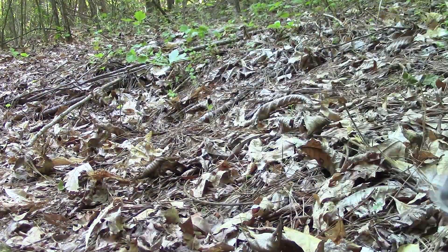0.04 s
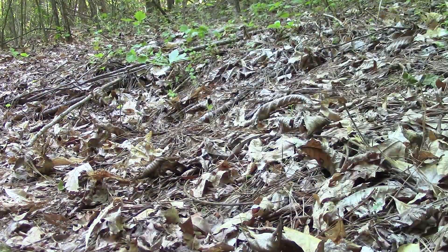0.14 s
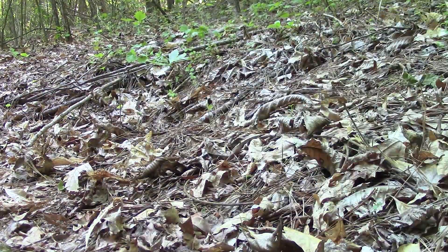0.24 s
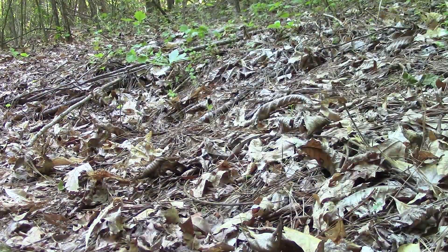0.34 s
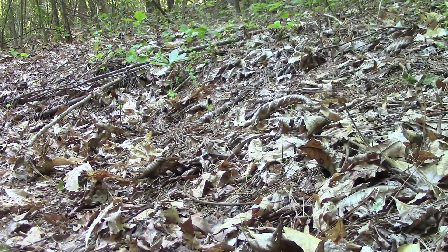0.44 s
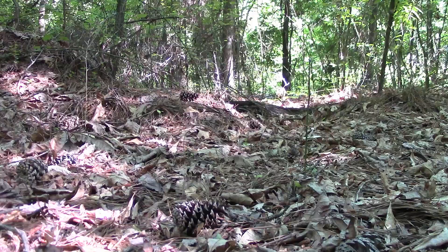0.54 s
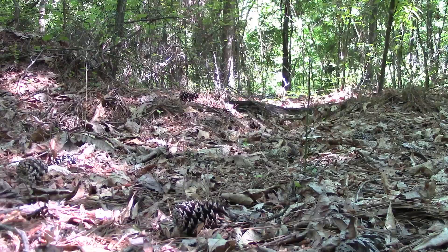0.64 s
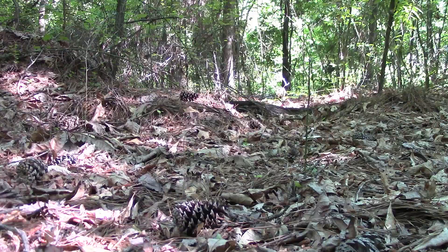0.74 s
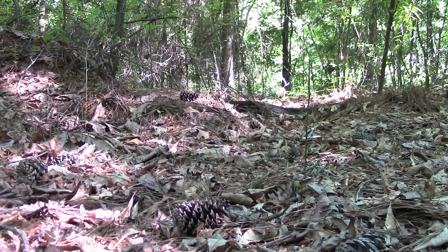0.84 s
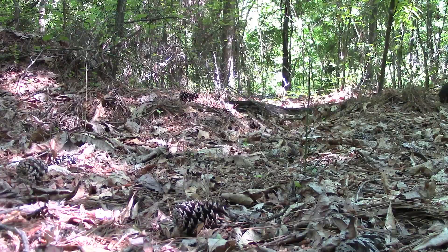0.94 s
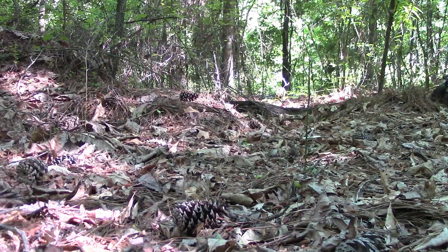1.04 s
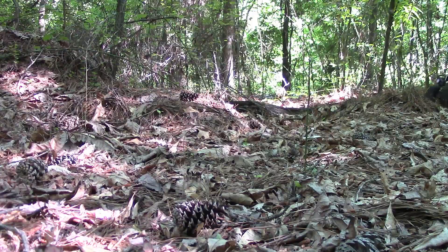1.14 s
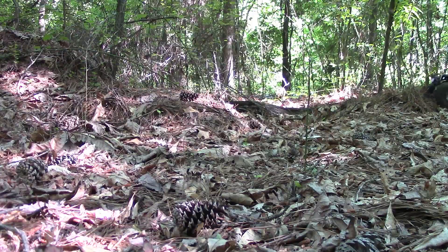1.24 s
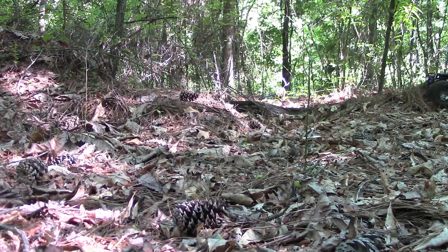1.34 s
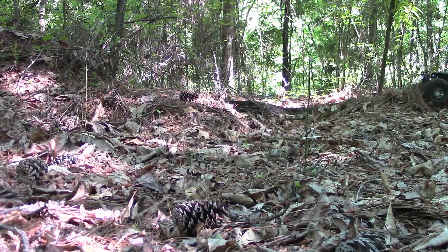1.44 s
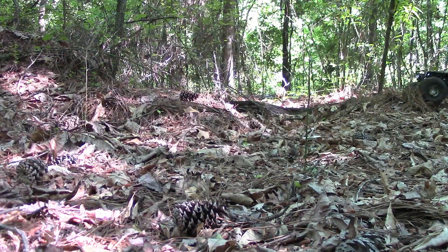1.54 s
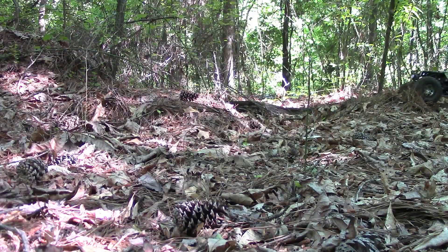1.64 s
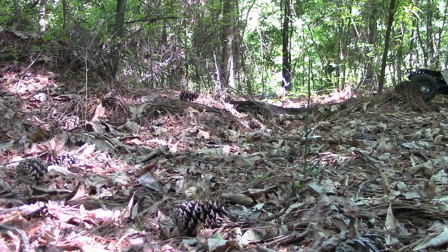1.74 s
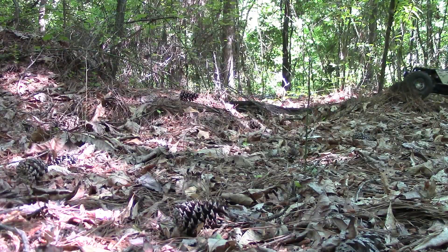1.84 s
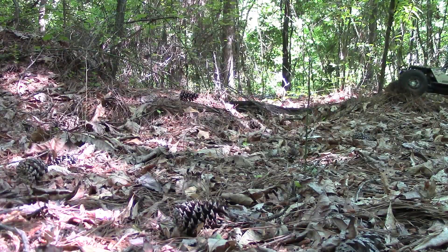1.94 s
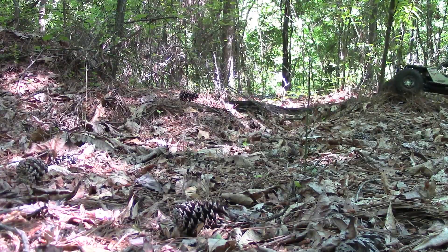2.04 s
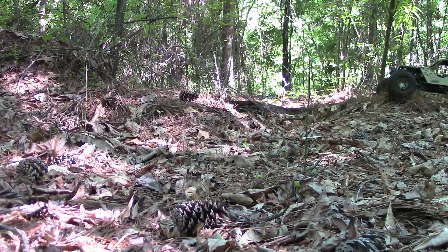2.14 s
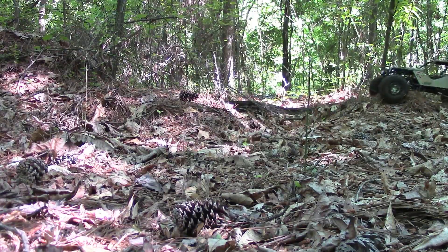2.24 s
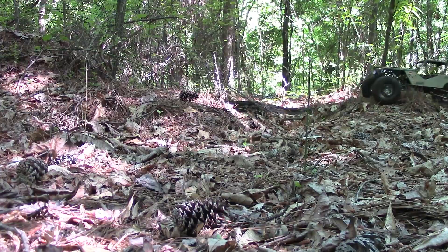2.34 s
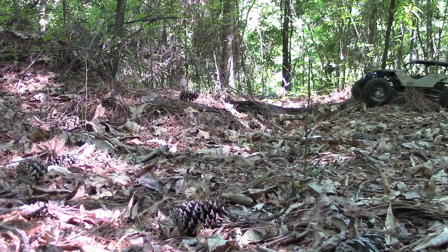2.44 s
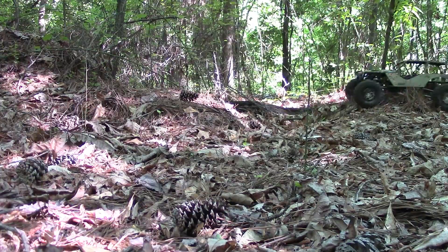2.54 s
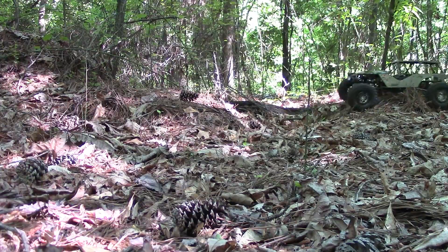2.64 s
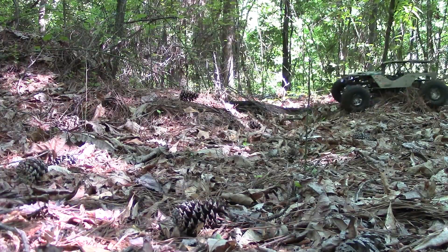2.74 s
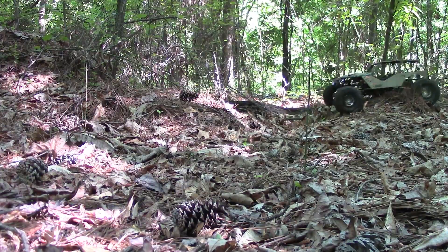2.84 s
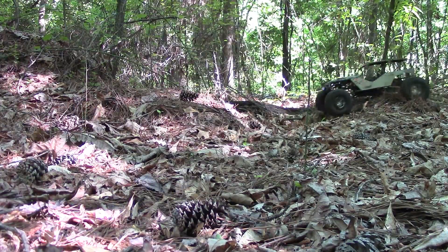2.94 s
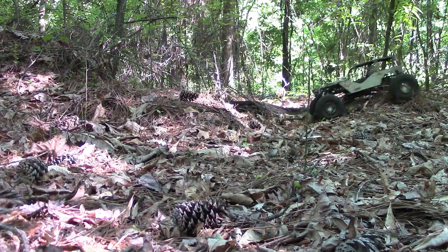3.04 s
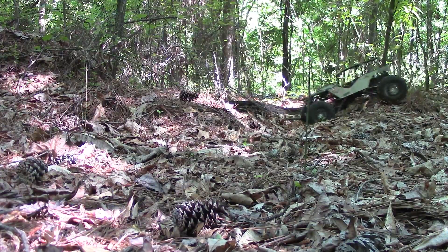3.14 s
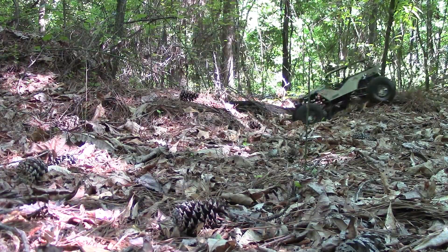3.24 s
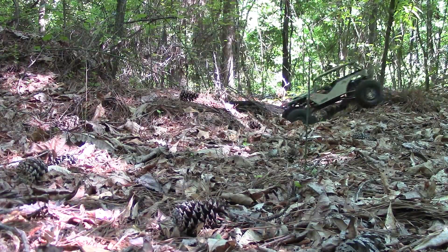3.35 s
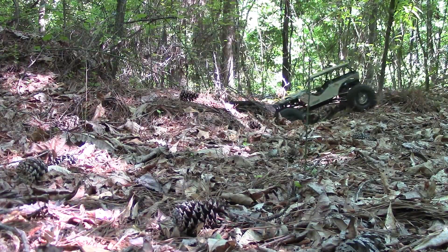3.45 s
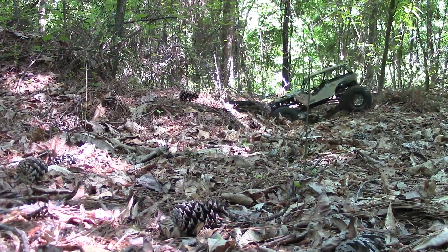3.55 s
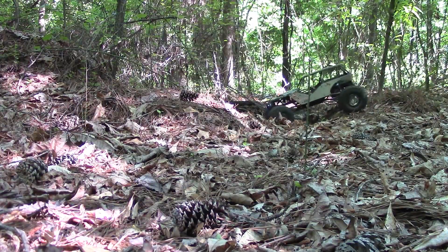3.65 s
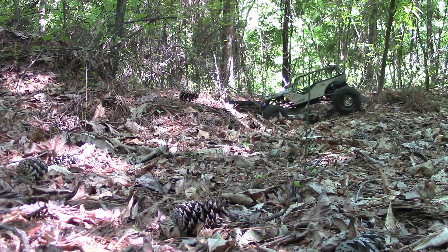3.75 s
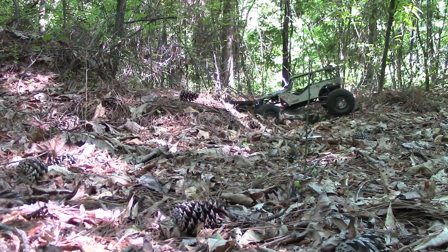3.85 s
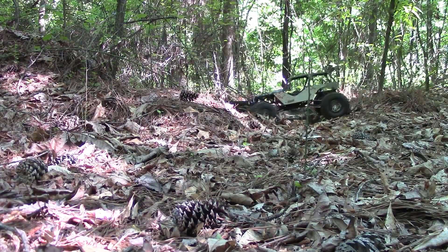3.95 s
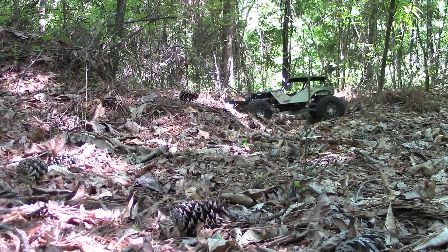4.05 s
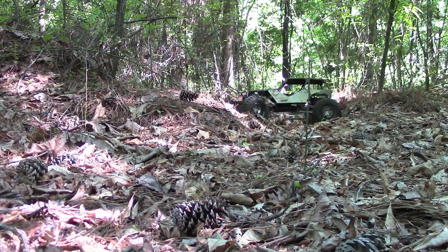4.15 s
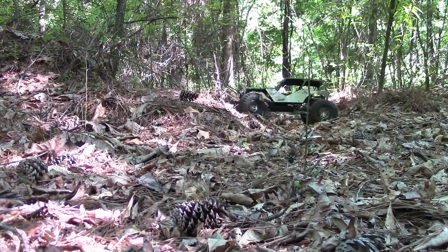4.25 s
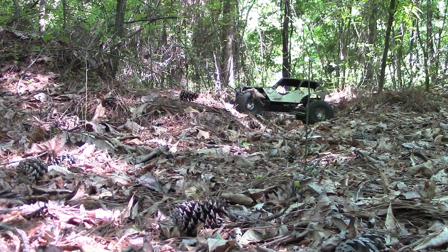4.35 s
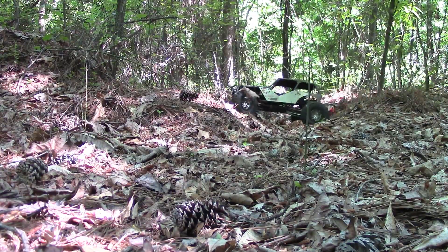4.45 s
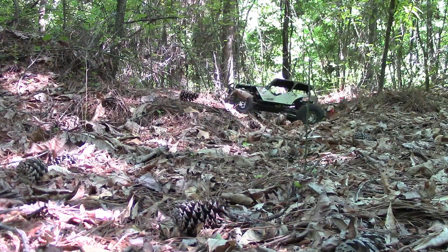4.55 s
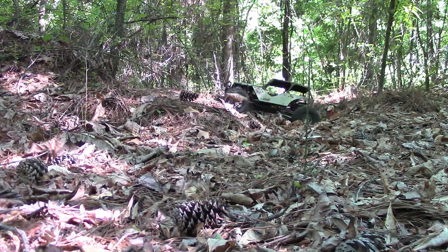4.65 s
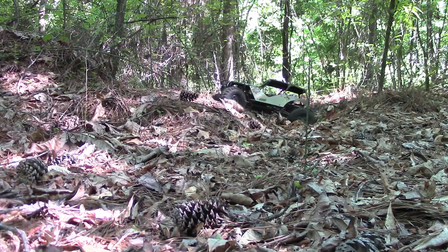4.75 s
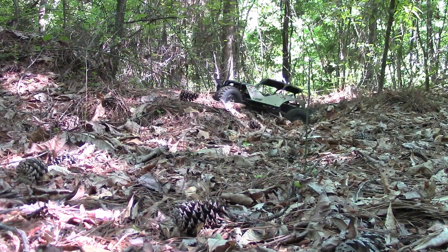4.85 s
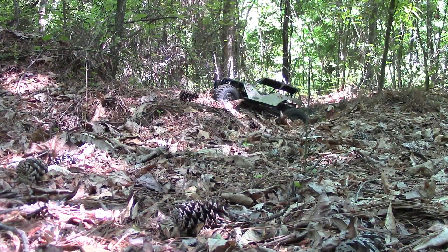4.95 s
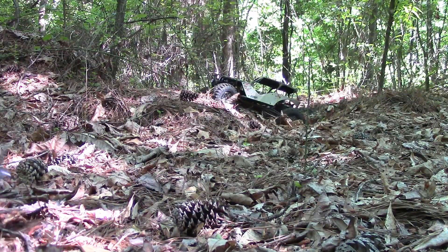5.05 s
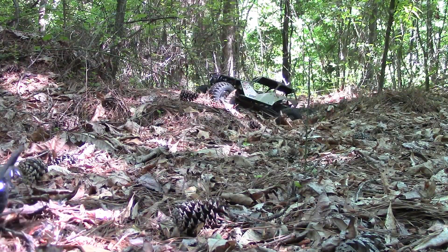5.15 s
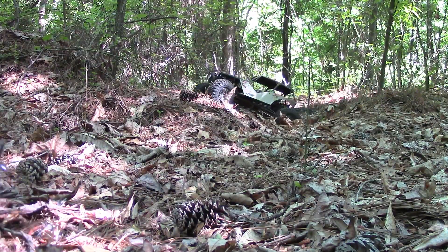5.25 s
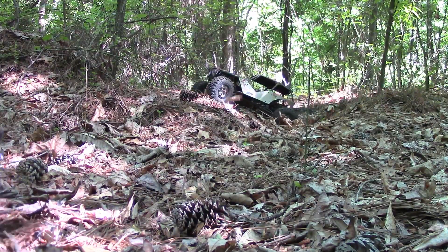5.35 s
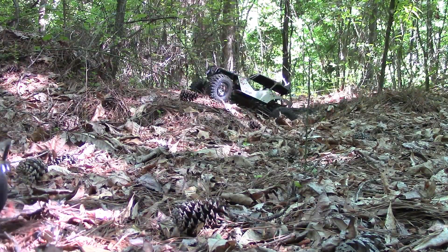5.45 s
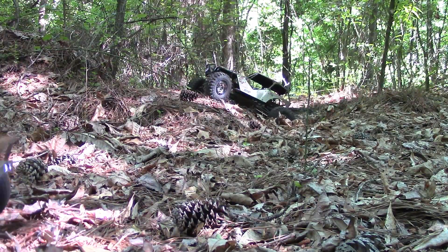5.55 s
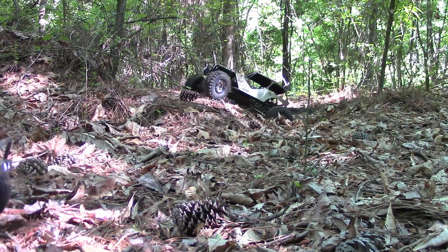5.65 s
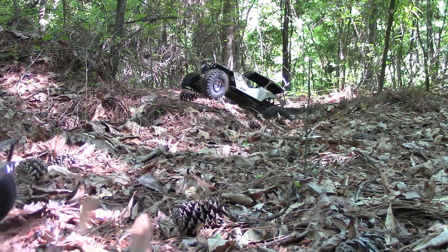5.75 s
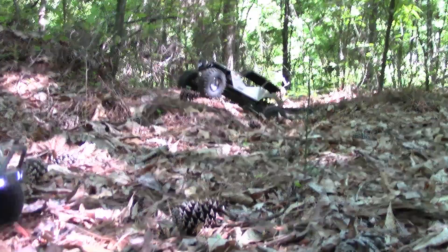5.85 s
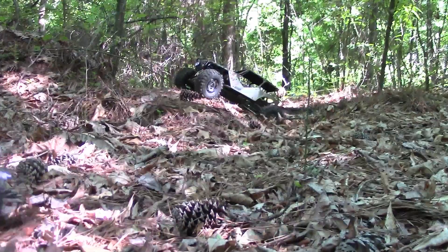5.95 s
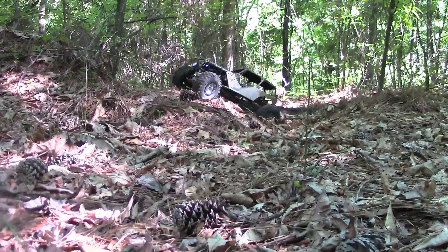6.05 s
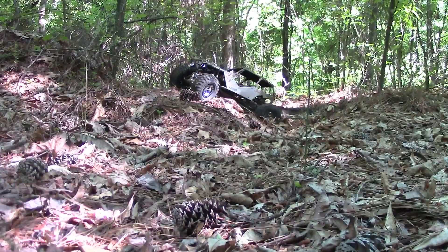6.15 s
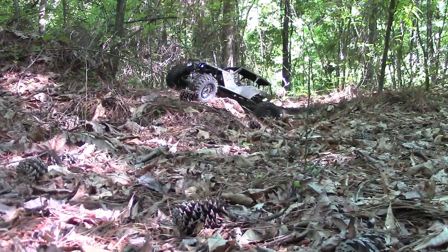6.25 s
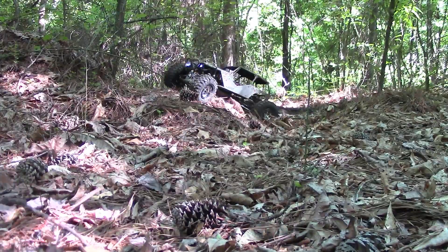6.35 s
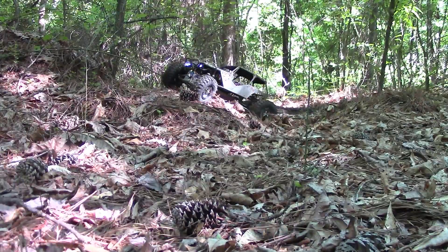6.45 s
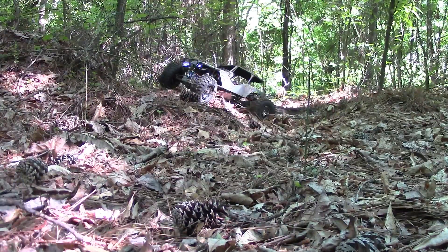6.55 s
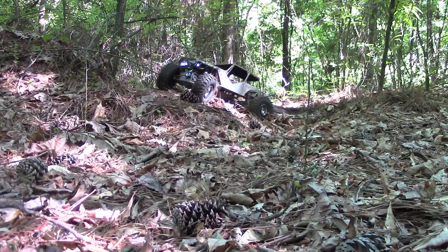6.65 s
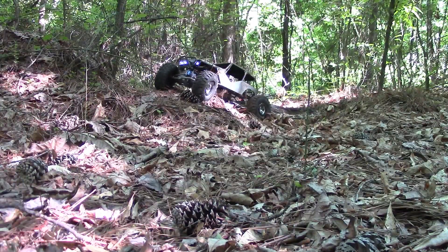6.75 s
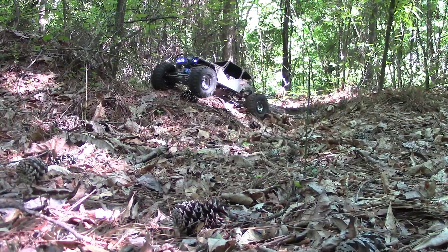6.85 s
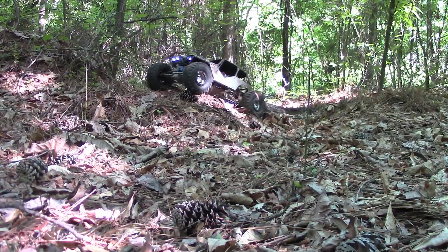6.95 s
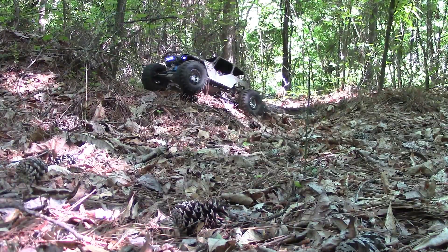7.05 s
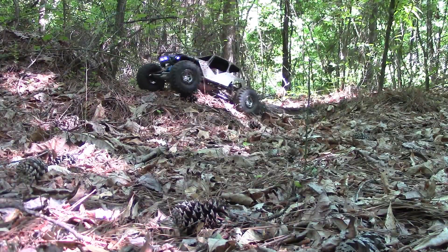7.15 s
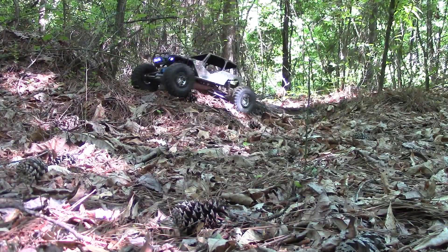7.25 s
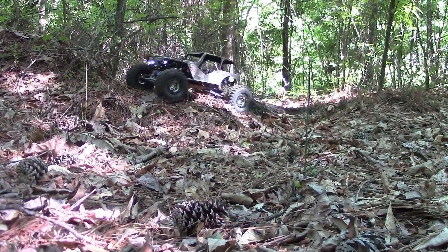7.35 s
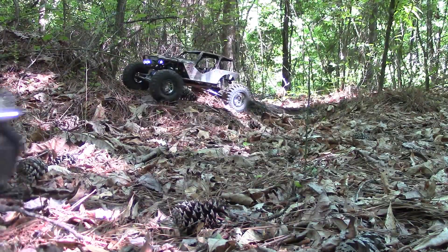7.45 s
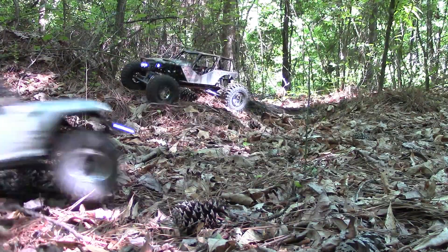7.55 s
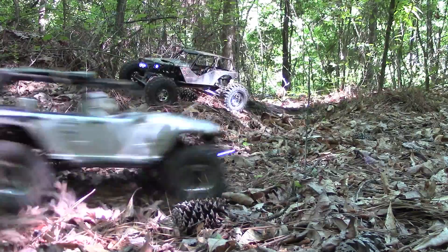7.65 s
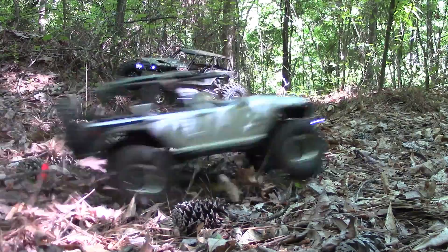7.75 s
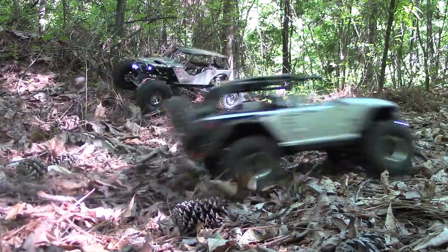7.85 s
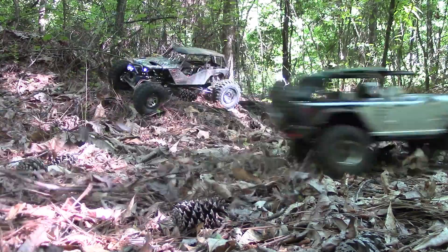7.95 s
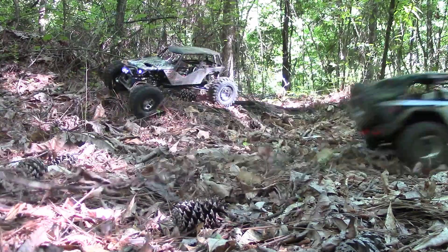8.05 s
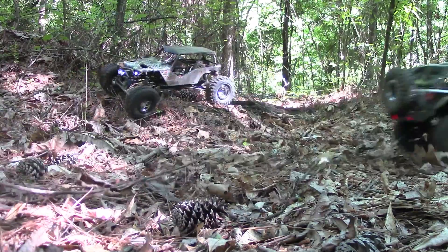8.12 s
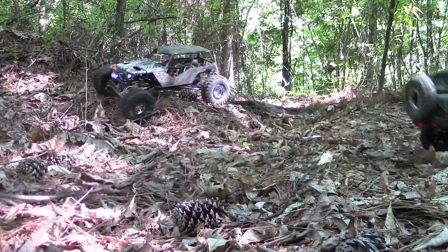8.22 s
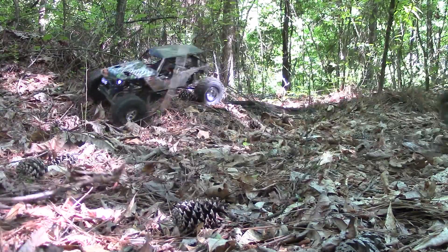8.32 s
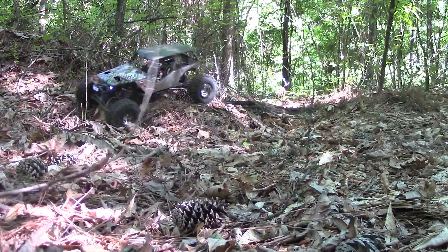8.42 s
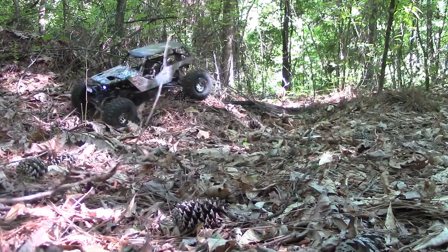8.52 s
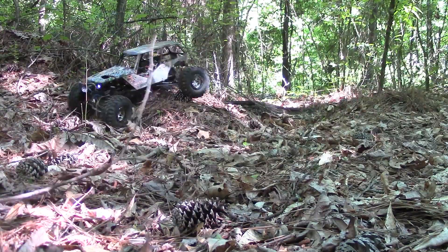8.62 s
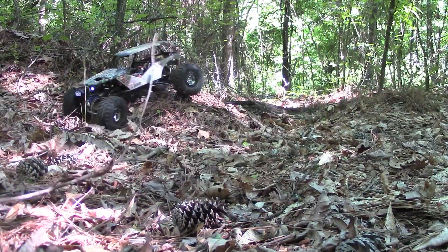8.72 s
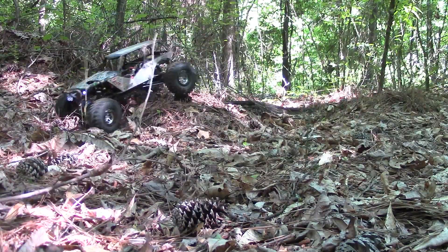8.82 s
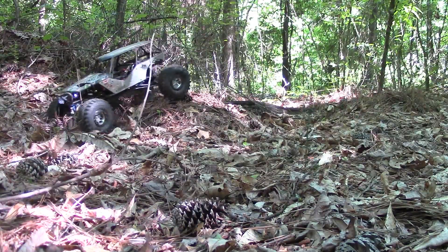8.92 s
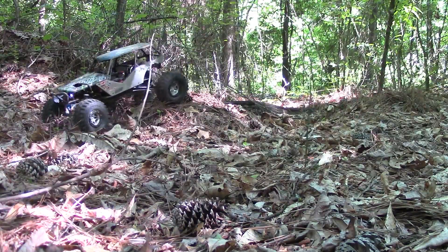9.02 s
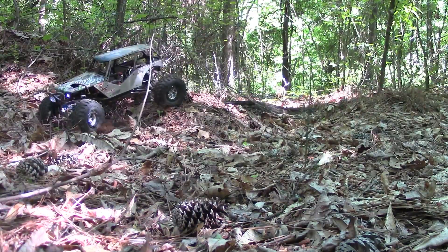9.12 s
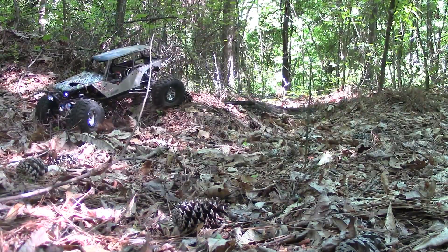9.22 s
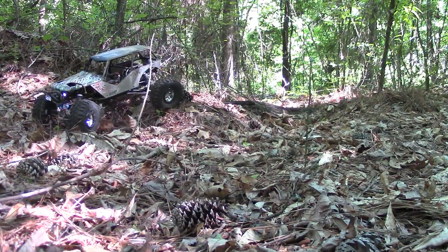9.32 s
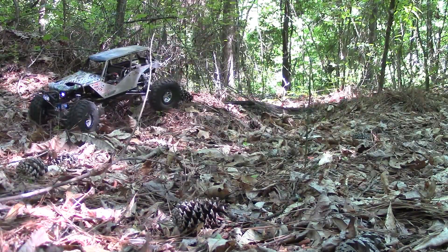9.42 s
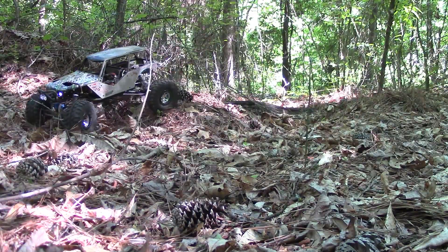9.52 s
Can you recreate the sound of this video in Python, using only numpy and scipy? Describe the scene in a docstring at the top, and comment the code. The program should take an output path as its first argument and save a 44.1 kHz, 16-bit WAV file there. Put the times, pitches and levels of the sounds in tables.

```python
"""Wheels rush through dry leaves right beside the microphone; at 0.6 s the rush breaks off sharply. Small
radio-controlled electric trucks drive on a wooded slope: a crawler climbs in bursts, gears whining and servo
buzzing; a second truck darts past about half a metre away, and a motor winds down. Tyres crush leaves, snap
twigs and shake the chassis; meshing teeth sing and rattle their plastic housings. Behind them the wood hisses
faintly, a far motor drones briefly and a speed controller whistles."""
import sys
import numpy as np
from scipy import signal
from scipy.fft import rfft, irfft, next_fast_len
from scipy.io import wavfile
from scipy.ndimage import map_coordinates

SR = 44100
rng = np.random.default_rng(int(sys.argv[2]) if len(sys.argv) > 2 else 0)


def store_pcm(level_fs):
    """Save levels as 16-bit WAV."""
    pcm = np.round(np.clip(level_fs, -1, 1) * 32767).astype(np.int16)
    wavfile.write(sys.argv[1], SR, np.atleast_2d(pcm).T)


N = 422478
TIME = np.arange(N) / SR
TICKS = np.arange(0, N + 64, 64) / SR  # coarse clock for slow curves, in seconds
TOP_HZ = 15950


def amp(db):
    """Decibels to gain."""
    return 10 ** (np.asarray(db) / 20)


def unit(x):
    """Scale to rms 1."""
    return x / np.sqrt(np.mean(x ** 2) + 1e-20)


def per_sample(ticked):
    """Spread one value a tick over the samples."""
    return np.interp(TIME, TICKS, ticked)


def curves(rows):
    """One value per sample for each column after the time."""
    times, *columns = np.transpose(rows)
    return [np.interp(TIME, times, column) for column in columns]


def wobble(rate):
    """A smooth random curve, rate knots a second."""
    knots = rng.standard_normal(int(N * rate / SR) + 4)
    return per_sample(map_coordinates(knots, [TICKS * rate]))


def envelope(start, length, attack_s, release_s, swell_db=0):
    """One gain a tick: up 20 dB per attack_s, a hold that swells by swell_db, down 20 dB per release_s."""
    age = TICKS - start
    held = np.clip(age / length, 0, 1) - .5
    outside = np.maximum(-age / attack_s, (age - length) / release_s)
    return amp(swell_db * held - 20 * np.clip(outside, 0, 10))


def spells(rows, attack_s, release_s):
    """The gain of a source switched on for each row of start_s, length_s, level_db."""
    return per_sample(sum(amp(db) * envelope(s, length, attack_s, release_s) for s, length, db in rows))


def filtered(x, response):
    """Filter x by a gain that is a function of frequency."""
    size = next_fast_len(N + SR // 2)
    return irfft(rfft(x, size) * response(np.fft.rfftfreq(size, 1 / SR)), size)[..., :N]


def shaped(x, spectrum):
    """Filter x by freq_hz, gain_db points joined on a log axis."""
    freq_hz, gain_db = np.transpose(spectrum)
    return filtered(x, lambda hz: amp(np.interp(np.log(hz + 1), np.log(freq_hz + 1), gain_db)))


def coloured(x, spectrum):
    """x shaped by the spectrum, at rms 1."""
    return unit(shaped(x, spectrum))


def tone(hz):
    """A sine at rms 1 that follows the pitch hz."""
    return np.sqrt(2) * np.sin(2 * np.pi * np.cumsum(hz) / SR)


def boost(resonances, hz):
    """The dB that a tone at hz gains from resonances."""
    return sum(db / (1 + (2 * (hz - centre) / width) ** 2) for centre, width, db in resonances)


# How far the two channels differ: freq_hz, side_minus_mid_db
STEREO_WIDTH = [(60, -16), (300, -15.5), (2000, -38), (4200, -32), (5300, -6), (7500, -8.5), (11500, -3),
                (13500, -2), (15500, -15)]
def stereo_noise():
    """White noise, alike in both channels except in the treble."""
    mid, side = rng.standard_normal((2, N))
    side = shaped(side, STEREO_WIDTH)
    return np.array([mid + side, mid - side])


def fractures(rate, spread_db, life_s, bed_db):
    """Tiny bursts of random size, rate a second, over a bed of countless smaller ones."""
    struck = rng.random(N) < rate / SR
    size = amp(spread_db * np.minimum(rng.standard_normal(N), 2.2))
    power = signal.lfilter([1], [1, -np.exp(-1 / (life_s * SR))], struck * size ** 2 / rate)
    return unit(stereo_noise() * np.sqrt(power / power.mean() + amp(bed_db) ** 2))


CLOSE_DB, CLOSE_FALL_DB_PER_S, CLOSE_END_S = -19.5, 4, .594
# Leaves churned right beside the microphone: freq_hz, level_db
CLOSE_LEAVES = [(35, -59), (60, -25), (118, -18), (193, -15.5), (323, -5.5), (469, -8), (636, -2),
                (749, -8), (1280, -1.5), (2770, -0.5), (4120, -3.5), (6280, -0.5), (10500, -7.5),
                (16000, -20)]
def close_rush():
    """Wheels spin through the litter close by, easing slightly; then the rush breaks off abruptly."""
    spray = fractures(rate=280, spread_db=4.5, life_s=.00052, bed_db=3.5)
    level_db = CLOSE_DB - CLOSE_FALL_DB_PER_S * TIME + .92 * wobble(59.3)
    gate = np.clip((CLOSE_END_S - TIME) / .016 + .5, 0, 1)
    return amp(level_db) * coloured(spray, CLOSE_LEAVES) * gate


# The wood all around the microphone: freq_hz, level_db
WOOD_AMBIENCE = [(18, -51), (30, -43), (103, -11), (227, -6.5), (266, -10.5), (404, -8.5), (600, -11),
                 (1220, -15.5), (5040, -16), (6050, -12), (6900, -69), (9220, -11.5), (16000, -27)]
def wood_hush():
    """A faint, steady hiss behind everything."""
    return amp(-41) * coloured(stereo_noise(), WOOD_AMBIENCE)


def far_motor():
    """A distant motor drones unevenly at first, then dies away."""
    gain = spells([(0, .6, -44)], attack_s=.01, release_s=1)
    return gain * amp(3.9 * wobble(30.2)) * tone(630 + 18 * wobble(60.1))


# A thin whistle, centred between the channels: start_s, length_s, level_db
WHISTLES = [(0, 0.85, -51), (1.9, 1.1, -49), (8.19, .05, -39)]
def controller_whistle():
    """A speed controller whistles at low throttle."""
    gain = spells(WHISTLES, attack_s=.04, release_s=.6)
    return gain * amp(2.4 * wobble(12)) * tone(5950 + 14 * wobble(150))


# Twigs and stiff leaves breaking under the wheels: start_s, level_db, pitch_hz
SNAPS = [(0.0388, -4.5, 6560), (0.1526, -0.5, 3560), (0.175, 2, 4450), (0.2276, -2, 6330),
         (1.3783, -13, 11500), (1.8687, -8, 10100), (1.9969, -12.5, 5000), (2.155, -10.5, 2060),
         (2.393, -16, 2000), (2.5194, -13, 5930), (2.6194, -15, 5580), (2.6928, -10.5, 5940),
         (3.7833, -14, 2940), (7.4562, -1, 2000), (7.5991, -1, 2800), (8.092, 1.5, 6390),
         (8.1004, -4, 8890), (8.5889, -4, 3230), (8.7564, -8, 8570), (8.7964, -6, 2840), (8.9494, -7, 8660),
         (9.0658, -11, 7900)]
def twigs():
    """Each snap is a sharp crack with a brief ring of the broken stick and a short crumble."""
    out, t = np.zeros(N + SR), np.arange(SR // 20) / SR
    thin = signal.butter(2, [1000, 12000], "band", fs=SR)  # small sticks radiate no bass
    for start, db, hz in SNAPS:
        crack, crumble = amp(-60 * t / .011), amp(-22 - 60 * t / .05)
        burst = signal.lfilter(*thin, rng.standard_normal(len(t)) * (crack + crumble))
        ring = signal.lfilter(*signal.iirpeak(hz, 2.5, SR), burst)
        snap = ring + amp(-1) * burst
        out[round(start * SR):][:len(t)] += amp(db - 1) * snap / np.abs(snap).max()
    return out[:N]


PINION_TEETH, FULL_REVS_HZ, GEAR_FADE_S = 20, 4400, .015
# Hum of an unbalanced motor: shaft_multiple, level_db
SHAFT_HARMONICS = [(1, -0.5), (2, -4.5), (3, -15)]
def gears(t, steady_hz, level_db, harmonics, flutter, rough_db, shaft_db):
    """Meshing teeth sing over the times t; uneven load shakes them, and the shaft hum grows with speed."""
    def shake(rate):
        return map_coordinates(rng.standard_normal(int(rate) + 4), [(t - t[0]) * rate], mode="mirror")

    inertia = np.sqrt(steady_hz / 2000)  # a fast rotor is harder to shake
    hz = steady_hz * (1 + flutter / inertia * (shake(59.8) + shake(301.3)))
    phase = 2 * np.pi * np.cumsum(hz) / SR
    turn = phase / PINION_TEETH
    imbalance = (hz / FULL_REVS_HZ) ** 4
    mesh = phase + .5 * imbalance * np.sin(turn)  # an off-centre pinion adds sidebands at high revs
    teeth = sum(amp(db + rough_db * (shake(46.3) + shake(200.3))) * np.sin(k * mesh)
                for k, db in harmonics)
    shaft = sum(amp(db + rough_db * shake(43.6)) * np.sin(k * turn) for k, db in SHAFT_HARMONICS)
    whine = teeth + amp(shaft_db) * imbalance * shaft
    fade = np.clip(np.minimum(t - t[0], t[-1] - t) / GEAR_FADE_S, 0, 1)
    out = np.zeros(N)
    out[round(t[0] * SR):][:len(t)] = np.sqrt(2) * fade * amp(level_db) * whine
    return out


HUNT_SHARE, HUNT_RATE_HZ = .0122, 16  # the speed wavers as the tyres grip and slip
GEARBOX_CUTOFF_HZ, SHAFT_DB = 1100, -39.5
# Gear tones under load: mesh_multiple, level_db
LOADED_HARMONICS = [(1, 0), (2, -10)]
# Resonances that swell the whine (gearbox) and the shaft hum (chassis): centre_hz, width_hz, boost_db
GEARBOX_RING = [(1463, 150, 10.5), (3200, 560, 3)]
CHASSIS_RING = [(211.6, 9, 9.5)]
# Moves of the throttle out on the slope: start_s, length_s, glide_s, from_hz, to_hz, base_level_db
THROTTLE_MOVES = [(0.537, 0.06, .05, 1270, 1384, -30), (1.21, .08, 0.075, 2370, 1980, -40),
                  (1.76, 0.12, 0.16, 2680, 2200, -43), (2.08, .07, .07, 2060, 1940, -36.5),
                  (2.164, 0.3, .2, 2110, 1980, -38), (2.521, .11, .11, 1870, 1670, -39),
                  (2.717, 0.094, .08, 1700, 1570, -35), (3.191, 0.174, .125, 1903, 1470, -33),
                  (3.475, .25, .12, 2900, 4265, -33.5), (4.395, 0.2, .17, 700, 4260, -34.5),
                  (4.575, .2, 0.12, 4150, 3240, -36.5), (5.291, .14, .22, 1132, 4400, -33),
                  (5.46, .3, 0.25, 4260, 4650, -30), (5.759, .135, .12, 4620, 4230, -28),
                  (5.961, .33, .22, 3140, 4030, -31), (6.681, 0.177, .22, 1050, 4100, -36.5),
                  (7.17, 0.072, 0.099, 3200, 3450, -34.5), (7.45, 0.18, .3, 3240, 2800, -28.5),
                  (8.275, 0.085, .09, 3470, 2780, -33)]
def throttle_whine():
    """Loaded gears whine roughly as the motor eases along an S-curve towards each new speed."""
    out = np.zeros(N)
    for start, length, glide, from_hz, to_hz, db in THROTTLE_MOVES:
        on = (TIME >= start) & (TIME < start + length)
        t = TIME[on]
        progress = np.clip((t - start) / glide, 0, 1)
        hz = from_hz + (to_hz - from_hz) * np.sin(np.pi / 2 * progress) ** 2
        hz *= 1 + HUNT_SHARE * progress * wobble(HUNT_RATE_HZ)[on]
        bass_loss_db = 10 * np.log10(1 + (GEARBOX_CUTOFF_HZ / hz) ** 4)  # the gearbox is small
        level_db = db + boost(GEARBOX_RING, hz) - bass_loss_db
        hum_db = SHAFT_DB + boost(CHASSIS_RING, hz / PINION_TEETH) - level_db
        out += gears(t, hz, level_db, LOADED_HARMONICS, flutter=.012, rough_db=2.7, shaft_db=hum_db)
    return out


PUSH_ATTACK_S = .089  # the tyres take up the load
DRIVE_RUN_OUT = .76  # chassis and gears fade in this share of the leaves' run-out
REBOUND_DB, REBOUND_S = -9, 1.0  # crushed leaves spring back after a push
# The floor between pushes, as the litter settles: crunch_db, crackle_db, rumble_db, rasp_db
SETTLING = (-41.5, -42.5, -47, -62)
# The crawler pushes up the slope, holds, then rolls out:
# start_s, length_s, run_out_s (per 20 dB), swell_db, crunch_db, crackle_db, rumble_db, rasp_db
PUSHES = [(0.59, 0.11, 0.9, -1, -35, -40, -39, -57), (1.022, .38, 1, 1, -34.5, -36.5, -39, -55),
          (1.515, 0.59, 5, 0, -35.5, -38.5, -42.5, -52), (1.976, 1, 7, 1, -31.5, -34.5, -38, -52),
          (2.96, 0.64, 0.7, -0.5, -26, -32.5, -33.5, -48), (3.554, .16, 0.1, -1, -23.5, -33, -26.5, -45),
          (3.842, .255, 0.14, 0.5, -22, -28.5, -29.5, -43), (4.481, 0.15, 0.5, 5.5, -26, -33, -31, -45),
          (4.737, 0.27, 0.32, 5.5, -20.5, -28.5, -28, -24.5), (5.327, 0.51, 0.8, 2, -20, -25, -26, -26),
          (5.819, 0.078, 0.1, -1.5, -16, -18, -22, -19.5), (5.973, 0.35, 0.62, -1, -19, -23.5, -28, -28.5),
          (6.74, 0.57, 0.4, 6, -25.5, -32.5, -31.5, -45), (8.293, 0.29, 1.4, -0.5, -25, -25.5, -32.5, -45),
          (8.747, 0.204, 0, -1, -28, -31.5, -34, -50), (8.98, .32, 0.64, -1.5, -30.5, -31.5, -40, -56)]
def crawler_effort():
    """Gains of crunch, crackle, rumble and rasp: each push drives all four, and the leaves rustle on."""
    gains = np.outer(amp(SETTLING), np.ones(len(TICKS)))
    is_leaf = np.array([[True], [True], [False], [False]])
    for start, length, run_out, swell_db, *levels_db in PUSHES:
        release_s = run_out * np.where(is_leaf, 1, DRIVE_RUN_OUT)
        push = envelope(start, length, PUSH_ATTACK_S, release_s, swell_db)
        rebound = is_leaf * amp(REBOUND_DB) * envelope(start, length, PUSH_ATTACK_S, REBOUND_S, swell_db)
        gains = np.maximum(gains, amp(levels_db)[:, None] * np.maximum(push, rebound))
    uneven_ground = amp(.72 * wobble(11))
    return [per_sample(gain) * uneven_ground for gain in gains]


def rasp(gain, modes):
    """Loaded teeth chatter and ring the hollow plastic housing, which is too small to carry bass."""
    def housing(hz):
        ring = sum((-1) ** k * amp(db) * 1j * hz * width / (centre ** 2 - hz ** 2 + 1j * hz * width)
                   for k, (centre, width, db) in enumerate(modes))
        return ring * hz ** 2 / (hz ** 2 + 220 ** 2)

    chatter = fractures(rate=600, spread_db=9.5, life_s=.0028, bed_db=-2.5)
    return gain * unit(filtered(chatter, housing))


# The crawler's gear housing: centre_hz, width_hz, level_db
CRAWLER_MODES = [(388, 160, 12), (4280, 450, -2), (7200, 1160, 5.5)]
def crawler_rasp(load):
    """The climbing truck's gears rattle their housing with each push."""
    return rasp(load, CRAWLER_MODES)


# Leaf crunch, fine crackle and chassis rumble as they reach the microphone: freq_hz, level_db
LEAF_CRUNCH = [(500, -30.5), (850, -6), (994, -12), (1130, -11.5), (1230, -3.5), (1900, -1.5), (2030, -1),
               (2520, -0.5), (3150, 1.5), (4100, 1.5), (5190, -3.5), (6500, 1), (8800, -6.5), (11400, -35),
               (19400, -120)]
LEAF_CRACKLE = [(4410, -51), (7500, -1), (10700, -1.5), (15100, -12), (16000, -14)]
CHASSIS_RUMBLE = [(29, -66), (50, -32.5), (200, -4.5), (242, -7.5), (298, -3), (391, 0), (561, -2),
                  (727, -3), (828, -8), (954, -4.5), (1100, -7.5), (1430, -14), (2420, -120)]
# A tyre loses grip on the slope and flings leaves: middle_s, length_s, crunch_db
SLIPS = [(3.12, .12, -26.5), (4.865, 0.023, -22.5), (4.922, 0.045, -19.5), (5.022, .03, -22),
         (5.094, .03, -23.5), (5.491, .035, -17.5), (5.552, 0.045, -16.5), (6.178, .06, -16.5),
         (7.27, 0.025, -19.5), (7.607, 0.02, -18), (8.11, 0.043, -20), (8.407, 0.034, -24), (8.6, .04, -26)]
def tyres(crunch_gain, crackle_gain, rumble_gain):
    """Treads crush leaves in clumps and shake the chassis; harder driving breaks more leaves at once."""
    slip = per_sample(sum(amp(db) * np.exp(-2 * ((TICKS - s) / length) ** 2) for s, length, db in SLIPS))
    crunch_gain = np.hypot(crunch_gain, slip)
    crackle_gain = np.hypot(crackle_gain, amp(-4) * slip)
    clump = amp(.8 * wobble(45))
    busy = np.clip(crunch_gain / amp(-25), amp(-12), amp(8))
    crunch = fractures(rate=650 * busy, spread_db=5, life_s=.0014, bed_db=3.5)
    crackle = fractures(rate=450 * busy, spread_db=4.5, life_s=.00077, bed_db=2)
    leaves = crunch_gain * clump * coloured(crunch, LEAF_CRUNCH)
    leaves += crackle_gain * amp(wobble(45)) * coloured(crackle, LEAF_CRACKLE)
    knocks = fractures(rate=120, spread_db=.5, life_s=.0068, bed_db=1.5)
    chassis = rumble_gain * clump * coloured(knocks, CHASSIS_RUMBLE)
    return (leaves + chassis) * (TIME > CLOSE_END_S)


# The servo's case: centre_hz, width_hz, level_db
SERVO_MODES = [(1470, 330, 4.5), (3600, 660, -15)]
# The crawler steers on its way up: start_s, length_s, level_db
STEERING = [(1.1, 1.8, -44.5), (2.95, 1.18, -33), (4.6, 0.39, -30.5), (6.45, 0.67, -34.5)]
def steering_servo():
    """The servo's gears buzz while the wheels are turned."""
    return rasp(spells(STEERING, attack_s=.15, release_s=.11), SERVO_MODES)


DART_START_S, DART_NEAREST_S, DART_END_S = 7.26, 7.734, 8.01
DART_DISTANCE_M, DART_SPEED_M_S = .57, 2.5
# The second truck at its nearest to the microphone: crunch_db, crackle_db, rumble_db, rasp_db
DART_LEVELS = (-16, -18.5, -24, -18)
def darter_effort():
    """The same four gains for a truck passing in a straight line: they follow its distance."""
    past_m = DART_SPEED_M_S * (TICKS - DART_NEAREST_S)
    distance_m = np.hypot(past_m, DART_DISTANCE_M)
    near = DART_DISTANCE_M / distance_m
    driving = envelope(DART_START_S, DART_END_S - DART_START_S, PUSH_ATTACK_S, release_s=.51)
    behind = past_m / distance_m
    spray = amp(4.5 * behind)  # crackle is thrown out behind it
    shaded = amp(-2 * np.maximum(behind, 0))  # chassis and gears are quieter going away
    gear_reach = near ** 1.36  # gears are heard mostly from close by
    gains = [near, near * spray, near * shaded, gear_reach * shaded]
    return [per_sample(amp(db) * driving * gain) for db, gain in zip(DART_LEVELS, gains)]


# The second truck's gear housing: centre_hz, width_hz, level_db
DARTER_MODES = [(313, 68, 1), (720, 98, 4), (2050, 180, -3), (3120, 740, -1), (9000, 1150, -1.5)]
def darter_rasp(load):
    """The passing truck's gears rattle their housing close to the microphone."""
    return rasp(load, DARTER_MODES)


# Gear tones off the throttle: mesh_multiple, level_db
COAST_HARMONICS = [(1, -1.5), (2, -8), (3, -8), (4, -5), (5, -12), (6, -18)]
# A motor winds down after the pass: time_s, pitch_hz, level_db
WIND_DOWN = [(8.36, 1230, -43), (8.45, 1158, -36), (8.54, 1090, -28), (8.6, 990, -28), (8.66, 875, -27.5),
             (8.72, 788, -32), (8.8, 755, -36), (8.93, 717, -33.5)]
def coasting_whine():
    """Coasting gears sing more cleanly, and fall in pitch as the motor slows."""
    hz, db = curves(WIND_DOWN)
    on = (TIME >= WIND_DOWN[0][0]) & (TIME < WIND_DOWN[-1][0])
    return gears(TIME[on], hz[on], db[on], COAST_HARMONICS, flutter=.004, rough_db=1.8, shaft_db=-10)


# How strongly the camera body shades the microphone's far channel: freq_hz, weight_db
BODY_SHADE = [(1800, -37), (2800, -10), (4300, -3.5), (5400, 3.5), (7200, 1), (10000, -0.5), (13000, -10),
              (15500, -16)]
# Where the trucks are, left (+) or right (-) of the microphone: time_s, pan_db
TRUCK_PATH = [(0, -2.5), (.57, -2.6), (.66, 0), (1.95, 1.3), (2.4, 4.6), (3, 5.5), (4.8, 4.5), (5.15, 2.5),
              (5.9, 1), (6.95, 6), (7.45, 2), (7.8, -1), (9.58, -1)]
def panned(x):
    """The treble leans to the trucks' side; the further off axis, the less alike the two channels."""
    pan_db, = curves(TRUCK_PATH)
    mid, side = (x[0] + x[1]) / 2, (x[0] - x[1]) / 2
    lean = (amp(pan_db) - 1) / (amp(pan_db) + 1)
    side = lean * shaped(mid, BODY_SHADE) + side * (.066 + .13 * np.abs(pan_db))
    return np.array([mid + side, mid - side])


def scene():
    """A brief close rush of wheels, then a cut to trucks, litter and wood on the slope."""
    *crawler_tyres, crawler_load = crawler_effort()
    *darter_tyres, darter_load = darter_effort()
    drive = crawler_rasp(crawler_load) + darter_rasp(darter_load) + steering_servo()
    litter = tyres(*np.hypot(crawler_tyres, darter_tyres)) + close_rush() + twigs()
    trucks = panned(litter + drive + coasting_whine() + throttle_whine())
    return trucks + wood_hush() + far_motor() + controller_whistle()


def record(dry):
    """The camera's microphone clips at full scale and keeps nothing above its band limit."""
    return filtered(np.clip(dry, -1, 1), lambda hz: hz < TOP_HZ)


dry = scene()
out = record(dry)
store_pcm(out)
```